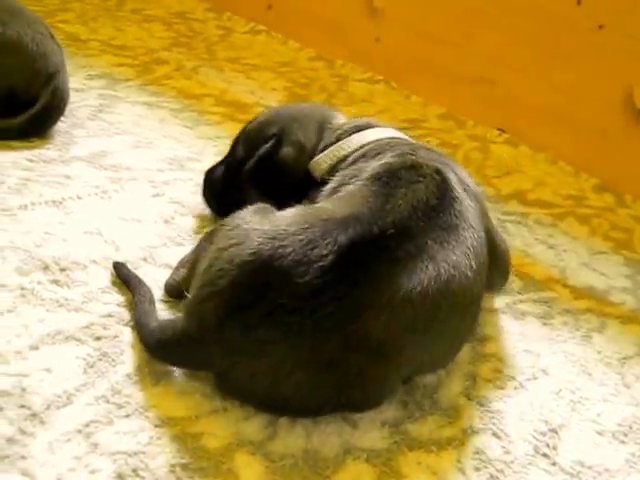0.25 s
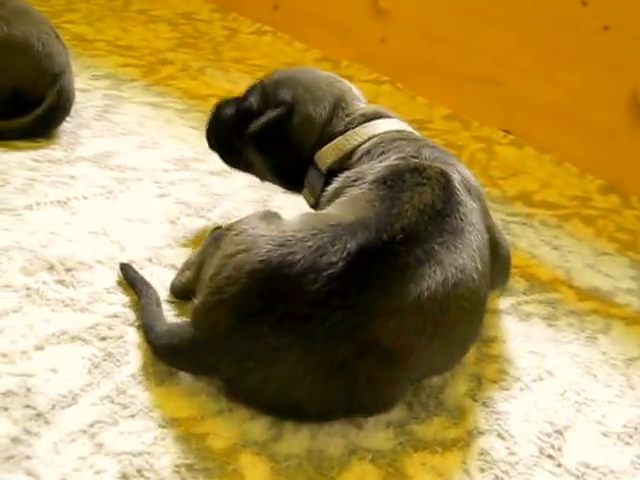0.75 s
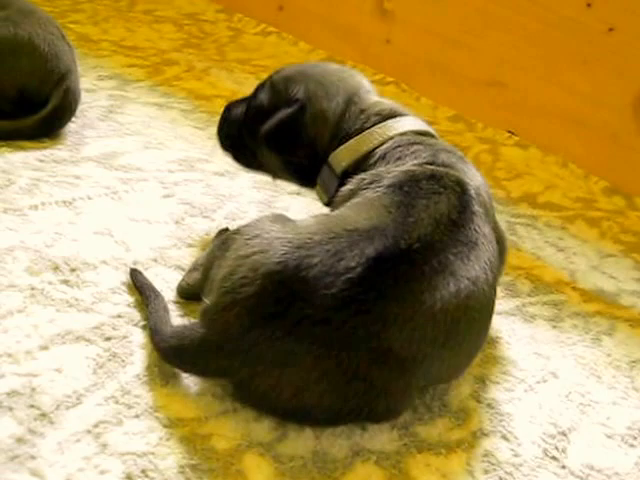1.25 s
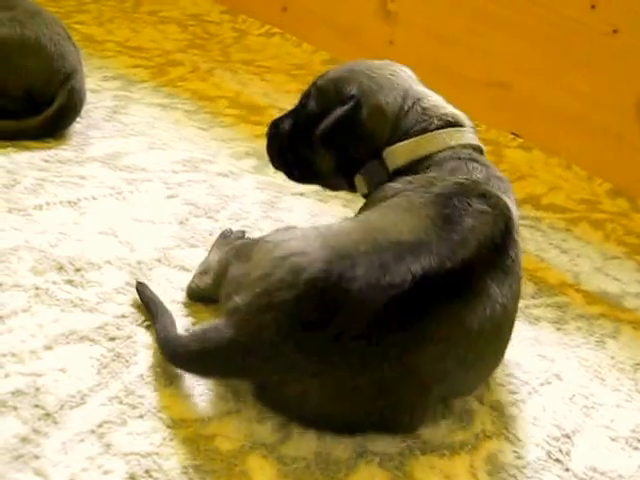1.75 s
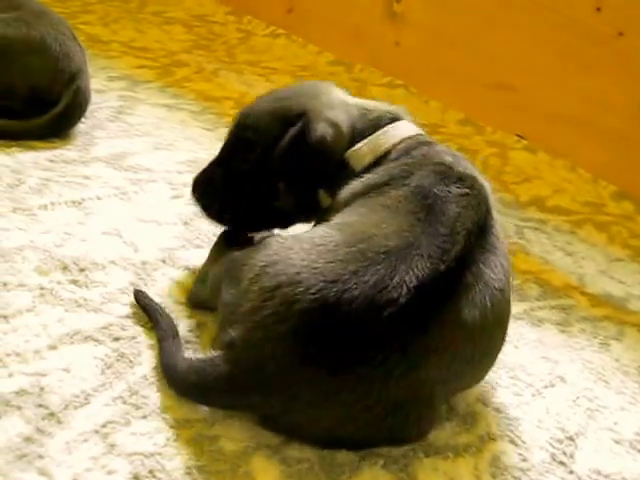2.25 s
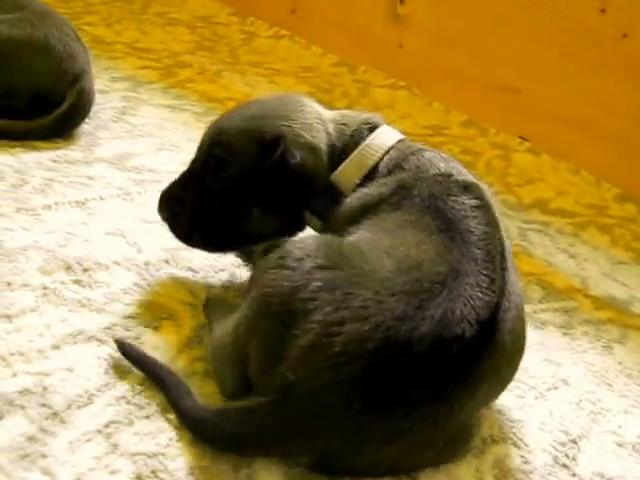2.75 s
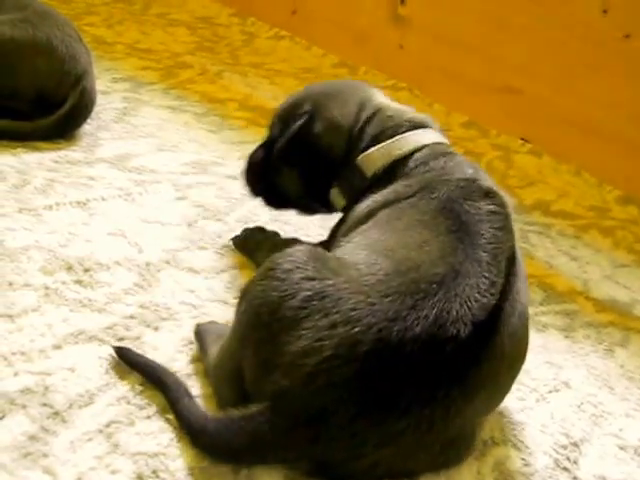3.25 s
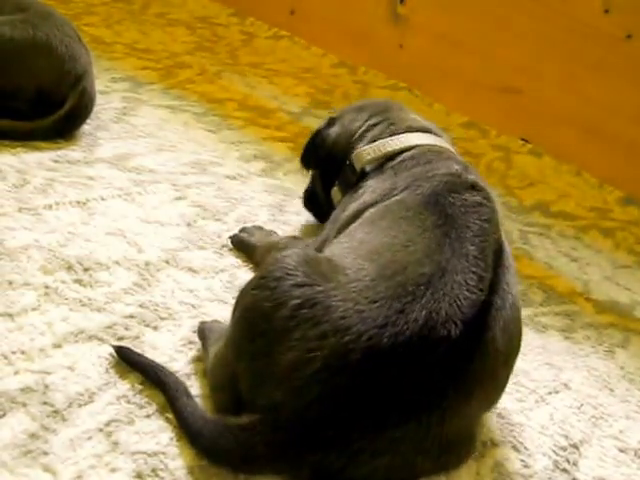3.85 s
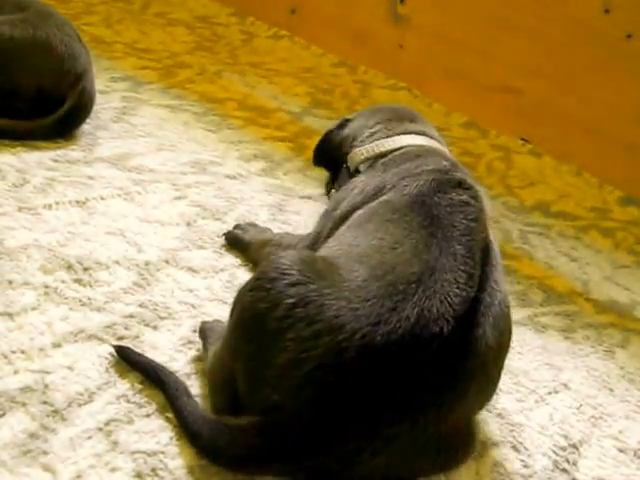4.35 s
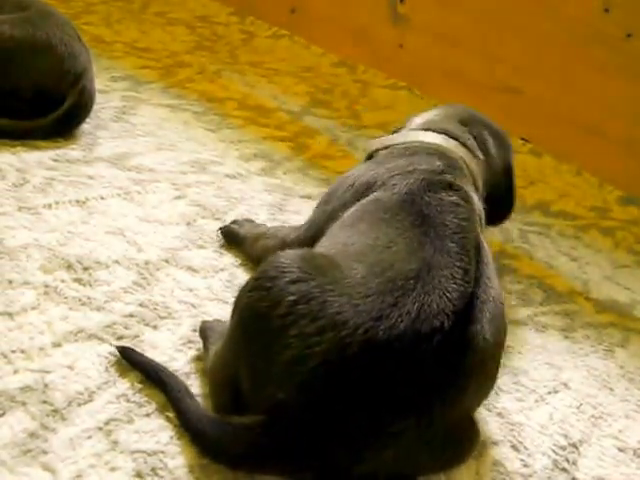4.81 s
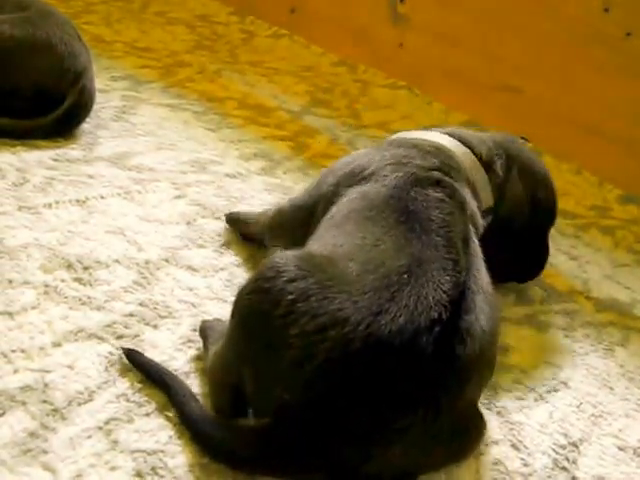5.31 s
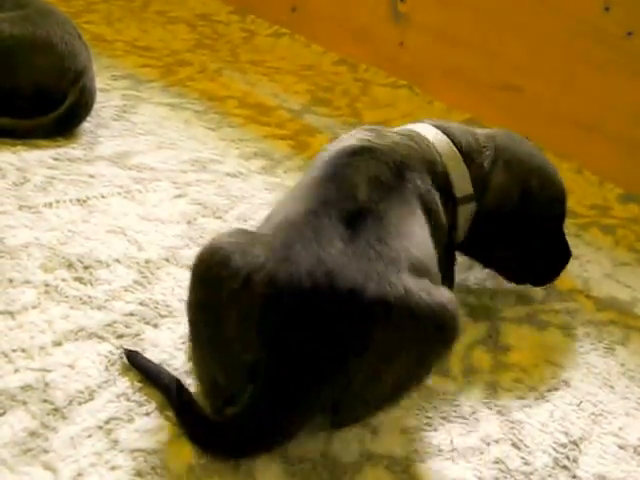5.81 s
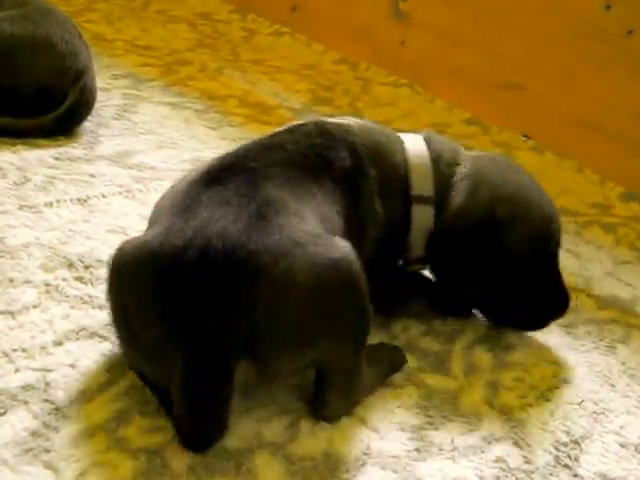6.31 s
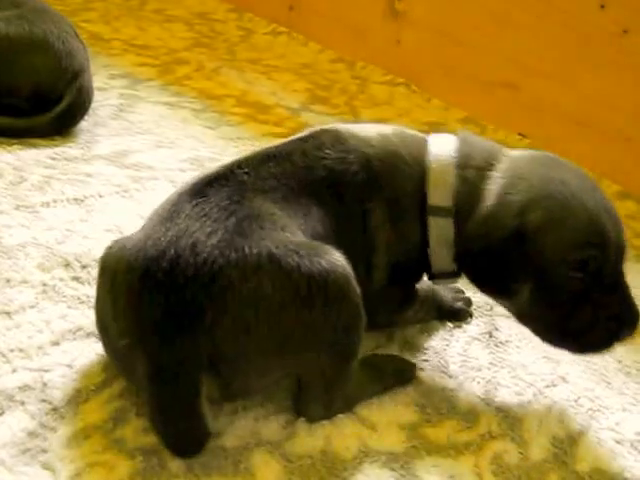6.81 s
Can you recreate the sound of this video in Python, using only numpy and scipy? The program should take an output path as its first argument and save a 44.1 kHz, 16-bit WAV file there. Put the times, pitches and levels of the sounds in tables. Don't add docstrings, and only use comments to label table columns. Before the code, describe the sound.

Brief puppy whines, high squeaks and creaky little grunts come one after another in a small hard-walled room, over soft thumps, ticks and hiss.

```python
import sys
import numpy as np
from scipy import signal
from scipy.fft import rfft, irfft, next_fast_len
from scipy.io import wavfile
from scipy.ndimage import uniform_filter1d, map_coordinates

SR = 44100
rng = np.random.default_rng(int(sys.argv[2]) if len(sys.argv) > 2 else 0)


def digitize_waveform(pressure):
    field = np.atleast_2d(pressure).T
    bounded = np.clip(field, -1, 1)
    quanta = np.round(bounded * 32767).astype(np.int16)
    wavfile.write(sys.argv[1], SR, quanta)


def amplitude_ratio(level_db):
    exponent = np.asarray(level_db, float) / 20
    return 10 ** exponent


N = 311787

# frequency in Hz, density in dB per Hz.
HISS_SPECTRUM = [(18, -51), (30, -7.5), (420, -3), (518, -6), (639, -3.5), (897, -5.5), (1470, -7),
                 (5740, -15), (7860, -18), (9430, -16), (15500, -23)]
# start in seconds, peak in dB, ring in Hz.
THUMPS = [(0.223, -54, 121), (0.249, -47.5, 403), (0.315, -50, 326), (0.383, -51, 350), (0.59, -53, 172),
          (0.734, -49, 272), (0.772, -48, 265), (1.593, -51, 145), (1.731, -50, 190), (1.865, -49, 277),
          (2.183, -48, 202), (2.676, -47, 254), (2.726, -46, 146), (3.484, -53, 191), (3.78, -45, 345),
          (3.834, -55, 196), (4.322, -55, 178), (4.404, -53, 200), (4.618, -52, 398), (4.811, -47, 450),
          (5.269, -49, 196), (5.615, -53, 293), (6.099, -50, 121)]
# frequency in Hz, t60 in seconds.
ROOM_DECAY = [(300, 0.21), (700, 0.55), (1100, 0.37), (2200, 0.21), (6000, 0.37)]
# centre in Hz, width in Hz, gain left as a ratio.
PORT_NOTCH = (7870, 1500, 0.033)
# start in seconds, length in seconds, pitch in Hz, glide in octaves, level in dB.
LITTERMATES = [
    (0.384, 0.155, 351, -0.064, -57),
    (.49, 0.024, 1730, -0.34, -62),
    (4.501, 0.076, 433, 0.0072, -62),
    (6.924, 0.066, 1280, -.1, -63),
]
# start in seconds, peak in dB, centre in Hz, t60 in seconds.
TICKS = [(0.104, -44, 750, 0.02), (2.912, -48, 13900, .02), (3.0355, -28.5, 9000, 0.0038),
         (3.036, -34, 3480, 0.014), (3.048, -41, 14500, 0.045), (3.254, -42, 9000, .015),
         (3.035, -37, 1800, .015), (3.619, -37, 9000, 0.012), (3.618, -43, 1090, 0.018),
         (5.043, -39, 1150, 0.02), (5.393, -32.5, 9500, 0.015), (5.425, -41, 15100, .03),
         (5.433, -42.5, 1390, .015), (5.497, -36, 13500, 0.019), (5.539, -32, 12000, 0.016),
         (5.541, -36.5, 3220, 0.032), (6.534, -41.5, 4500, 0.058), (6.536, -42, 14000, .03),
         (6.561, -37, 11000, 0.018), (6.595, -42, 14000, 0.048), (6.607, -49, 14000, 0.019)]
# centre in Hz, width over centre as a ratio.
TICK_WIDTH = [(1000, 0.92), (4000, 0.56), (10000, 2.5), (14500, 0.39)]
# start in seconds, length in seconds, level in dB, centre in Hz,
# width in Hz.
RUSTLES = [
    (0.968, 0.22, -60.5, 1610, 1500),
    (2.464, 0.031, -51, 4540, 6000),
    (2.965, .04, -64, 15000, 2500),
    (2.97, 0.034, -57, 3000, 3000),
    (3.111, 0.039, -58.5, 3870, 2500),
    (3.113, 0.047, -52, 1510, 1300),
    (3.154, 0.073, -55, 610, 513),
    (3.221, 0.046, -59, 2590, 1505),
    (5.94, 0.075, -61.5, 4270, 2500),
]

# start in seconds, length in seconds, pitch in Hz, level in dB,
# second partial in dB, third partial in dB.
HUMS = [(2.454, 0.015, 526, -33, 4, -5), (2.966, 0.02, 430, -39.5, 2.5, -10),
        (3.262, 0.04, 630, -44, -13, -17), (3.675, 0.034, 623, -43.5, -10, -20),
        (4.108, 0.043, 608, -44, -2, -10.5), (5.574, 0.018, 600, -47.5, 0, 3.5),
        (6.669, 0.022, 608, -35.5, -16, -24), (1.174, 0.025, 615, -37.5, -23, -24),
        (1.516, 0.016, 1156, -32, -30, -38), (1.923, .016, 1168, -31.5, -27, -40),
        (5.478, 0.011, 1170, -35.5, -20, -40), (5.836, .013, 1230, -34.5, -22, -40),
        (4.65, 0.023, 723, -44, -7, -20), (5.078, 0.019, 699, -41.5, -10, -20),
        (6.201, .018, 720, -40.5, -9, -20)]
# start in seconds, length in seconds, peak in dB, ring in Hz.
CREAKS = [(0.101, 0.026, -40.5, 333), (1.519, 0.023, -37, 1590), (1.924, 0.012, -29.5, 710),
          (2.321, 0.021, -32, 608), (2.745, 0.021, -32, 926), (3.271, 0.024, -37.5, 1100),
          (3.275, .03, -43, 1550), (3.674, 0.02, -41, 1290), (4.118, 0.039, -37, 870),
          (2.745, 0.015, -30.5, 590), (4.655, 0.024, -36, 1240), (5.08, 0.021, -36, 897),
          (5.48, 0.0095, -39.5, 600), (5.836, 0.014, -33, 803), (6.215, 0.041, -27, 1208),
          (6.672, 0.035, -32, 1050), (7.044, 0.047, -28, 642), (7.051, .03, -33.5, 400),
          (7.048, 0.044, -31.5, 1010)]
# start in seconds, peak in dB, ring in Hz.
STOPS = [(1.186, -41, 894), (1.648, -45, 2030), (2.072, -21.5, 753), (2.071, -31.5, 1217),
         (2.455, -23.5, 1042), (2.968, -34, 873), (3.386, -35, 438), (4.726, -34.5, 610), (5.14, -32, 592),
         (3.748, -37, 595), (5.986, -24.5, 903), (6.427, -28, 496), (6.755, -23, 910), (6.758, -27.5, 553),
         (6.77, -25, 680), (6.771, -32.5, 1036), (6.778, -28, 400)]

# time in seconds, pitch in Hz, effort in dB, mouth opening from 0 to 1.
SQUEAKS = [
    [(1.521, 807, -50, 0.9), (1.533, 880, -33.5, 0.5), (1.56, 1048, -37.5, 0.96), (1.572, 1162, -29, 0.35),
     (1.594, 1288, -32.5, 0.75), (1.62, 1184, -33.5, .6), (1.648, 1137, -40, 0.55),
     (1.662, 1070, -33.5, 0.52)],
    [(1.93, 697.5, -35.5, 0.36), (1.955, 771, -45, 0.58), (1.966, 868, -31.5, 0.59),
     (2.0, 1059, -34.5, 0.72), (2.018, 1037, -33, 0.38), (2.042, 848, -32.5, 0.13), (2.062, 823, -32, 0.5),
     (2.074, 810, -27.5, 0.63)],
    [(5.485, 926, -35, 0.97), (5.493, 948, -34, 0.67), (5.523, 1043, -40.5, 0.77), (5.531, 1114, -31, 0.64),
     (5.547, 1146, -32.5, 0.9), (5.57, 1144, -33.5, .8), (5.582, 1175, -38.5, 0.63),
     (5.595, 1160, -39, 0.64)],
    [(5.842, 903, -47, 1), (5.852, 983, -34.5, 0.84), (5.88, 1080, -40.5, 0.85), (5.888, 1167, -26.5, 0.92),
     (5.91, 1266, -26, 0.98), (5.935, 1157, -30, 0.82), (5.958, 1092, -29.5, 0.74), (5.97, 1041, -34, 0.69),
     (5.995, 949, -38.5, 1)],
]
WHIMPERS = [
    [(2.33, 467, -43.5, 0.55), (2.372, 515.7, -34, 0.57), (2.395, 563.5, -33, 0.6),
     (2.415, 614.4, -30, 0.35), (2.43, 637.7, -32.5, 1), (2.45, 652, -31.5, 0.98), (2.46, 613, -30, 0.75)],
    [(2.758, 562, -40.5, 0.3), (2.778, 460.4, -39.5, 0.43), (2.803, 489, -37, 0.57),
     (2.841, 589, -37, 0.48), (2.87, 524.5, -39, 0.34), (2.91, 548.4, -37, 0.48),
     (2.955, 537.3, -33.5, 0.72), (2.974, 503, -40.5, 0.24)],
    [(5.087, 483.5, -52, 0.46), (5.11, 490.4, -49.5, 0.57), (5.127, 499, -50.5, 0.62),
     (5.143, 565, -37.5, 0.37), (5.155, 580, -48, .1)],
    [(6.228, 612.6, -47, 0.04), (6.238, 564, -36.5, 0.3), (6.249, 498, -37.5, 0.63),
     (6.275, 560, -33.5, 0.7), (6.29, 575, -30.5, 0.71), (6.312, 581.5, -29.5, 0.76),
     (6.345, 535.5, -35, 0.64), (6.418, 491.2, -39.5, 0.51), (6.436, 429, -41, 0)],
    [(1.015, 306.6, -59.5, 0.23), (1.057, 307, -62, 0.37), (1.088, 287, -56, 0.06)],
]
GRUNTS = [
    [(1.094, 383.5, -58, 0.4), (1.108, 382, -53, 0.5), (1.125, 375, -47, 0.42), (1.14, 366, -40, 0.41),
     (1.153, 411.5, -43.5, 0.76), (1.165, 446, -40.5, 0.33), (1.18, 462, -48, 0.43), (1.192, 450, -60, 0.3)],
    [(3.28, 436, -46, 0.06), (3.305, 435, -45, 0.34), (3.323, 384.6, -37, 0.82), (3.335, 417, -41, 0.65),
     (3.35, 445, -36.5, 0.4), (3.375, 462, -38.5, 0.4), (3.388, 436, -38.5, .35), (3.397, 425, -54, 0.24)],
    [(3.688, 433, -43.5, 0.63), (3.7, 406, -44, 1), (3.724, 358.3, -43.5, 0.27), (3.735, 371, -43.5, 0.32),
     (3.743, 378, -39, 0.48), (3.752, 379, -48, 0.4), (3.761, 365, -61, 0)],
    [(4.14, 435, -47, 0.57), (4.154, 386, -45.5, 0.3), (4.168, 386, -49.5, 0.4), (4.176, 375, -43.5, 0.39),
     (4.184, 370, -52, 0.1)],
    [(4.662, 426, -41, 0.83), (4.675, 463.3, -38, 0.46), (4.698, 445.4, -38, 0.54), (4.71, 459, -37, 0.48),
     (4.722, 473, -38.5, 0.59), (4.732, 470, -58, 0)],
    [(6.68, 522.6, -45, 0.38), (6.7, 442, -51.5, 0.37), (6.722, 367.5, -42, 0.48),
     (6.735, 370.5, -43.5, 0.6), (6.748, 395, -40.5, 0.3), (6.76, 408, -41, 0)],
]
# one value in dB a call, in the order squeaks, whimpers, grunts.
CHEST_DB = [2, 1, -2, 0, 4, 2, 1, 4.5, 13.5, 6, 3.5, 5.5, 6.5, 0, 13]
# treble in dB, partials above the third in dB,
# second throat resonance in dB, top throat resonances in dB.
HEAD_AIM = [(-19.5, -6, -1, -21), (-13.5, 0, -7.5, -12.5), (-25, 2, 3, -15), (-21, -2, 7, -34),
            (-12.5, 7.5, -15, -9.5), (-17, 11, -9.5, -10), (-24.5, 15.5, 0, 1), (-14.5, 7, -4.5, -7),
            (-23, 1, -6, -8), (-16.5, 1, -12, -8), (-22, -2.5, -7, -8), (-29, 3, 1, -3), (-38, 9, -7, -9),
            (-18, 2, -4.5, -1.5), (-13.5, 1, -7, -6)]
# frequency in Hz, gain in dB.
AIRWAY = [(350, -12), (600, -5), (900, 0), (1250, 0), (1700, -4), (2100, -13), (2500, -29), (3300, -48)]
# frequency in Hz, gain in dB.
ROLL_OFF = [(900, -17), (1500, -15), (1800, -21), (2100, -30.5), (2500, -34), (3500, -63), (5000, -89)]
# centre in Hz, width in Hz.
THROAT = [(5850, 1060), (10000, 1070), (11800, 860), (14200, 1300)]
# start in seconds, end in seconds, halfway lines in dB, band centre in Hz,
# band width in Hz.
DOUBLING = [
    (2.84, 2.905, 2, 1400, 2900),
    (2.885, 2.96, -10, 1200, 2000),
    (5.46, 5.515, -2.5, 1350, 390),
    (4.3, 5.87, 3, 1240, 670),
    (1.8, 2.0, -22, 1500, 600),
]
# start in seconds, end in seconds, depth in dB.
HOARSE = [(1.523, 1.555, -9), (1.93, 1.975, -7), (2.06, 2.083, -8), (1.12, 1.19, -16), (2.33, 2.46, -20),
          (2.758, 2.79, -12), (2.79, 2.91, -16), (3.28, 3.33, -13), (3.36, 3.397, -18), (3.688, 3.715, -12),
          (4.14, 4.16, -13), (4.662, 4.732, -15), (6.26, 6.436, -22), (5.842, 5.885, -10),
          (6.228, 6.255, -7), (6.68, 6.71, -12)]

SHUT_HZ, OPEN_OCTAVES, MOUTH_Q, MOUTH_DB = 511.4, 2, 1.74, 10.5
NASAL_HZ, NASAL_WIDTH_HZ, NASAL_DB = 810, 46, -7.5
LOUD_DB, TREBLE_DB_PER_EFFORT_DB, TREBLE_RISE_DB, TOP_STEP_DB = -35, 0.51, 2.5, -9
STOP_S, CREAK_RATE_HZ, RATE_EXPONENT = 0.017, 300.3, 0.27


def along(points, hz):
    f, v = np.transpose(points)
    return np.interp(np.log(hz + 1), np.log(f + 1), v)


def unit(x):
    return x / np.sqrt(np.mean(x ** 2) + 1e-20)


def wobble(n, rate_hz):
    knots = rng.standard_normal(int(n * rate_hz / SR) + 4)
    return map_coordinates(knots, [np.arange(n) * rate_hz / SR])


def filtered(x, response):
    m = next_fast_len(len(x) + 8192)
    return irfft(rfft(x, m) * response(np.fft.rfftfreq(m, 1 / SR)), m)[:len(x)]


def resonance(f, hz, width_hz):
    return 1j * f * width_hz / (hz * hz - f * f + 1j * f * width_hz)


def stretch(t, start, end, edge_s):
    return np.clip(np.minimum(t - start, end - t) / edge_s, 0, 1)


def add(track, s, x):
    part = track[round(s * SR):][:len(x)]
    part += x[:len(part)]


def thumps():
    track, t = np.zeros(N), np.arange(2000) / SR
    for s, db, hz in THUMPS:
        push = t / 0.0061 * np.exp(1 - t / 0.0051)
        add(track, s, amplitude_ratio(db - 4.5) * np.sin(2 * np.pi * hz * t) * push)
    return track


def hiss():
    steady = unit(filtered(rng.standard_normal(N), lambda f: amplitude_ratio(along(HISS_SPECTRUM, f))))
    when, size = rng.random((2, 90))
    blows = np.bincount((when * N).astype(int), amplitude_ratio(11 * size), N)
    patter = filtered(blows, lambda f: resonance(f, 200, 220) ** 2)
    return amplitude_ratio(-55.5) * steady + amplitude_ratio(-72) * unit(patter) + thumps()


def room(x, sway_hz, box_db, box_t60_s):
    hz, t, z = signal.stft(rng.standard_normal((3, SR // 2)), SR, nperseg=256)
    decay = amplitude_ratio(-60 * t / along(ROOM_DECAY, hz)[:, None])
    decay = decay + amplitude_ratio(box_db - 60 * t / box_t60_s)
    tails = signal.istft(z * decay, SR, nperseg=256)[1]
    aim = np.array([wobble(N, sway_hz) for _ in tails])
    feeds = x * aim / np.linalg.norm(aim, axis=0)
    feeds = np.pad(feeds, ((0, 0), (220, 0)))
    tails = tails / np.linalg.norm(tails[0])
    return signal.fftconvolve(feeds, tails, axes=1).sum(axis=0)[:N]


def littermates():
    track = np.zeros(N)
    for s, length, hz, octaves, db in LITTERMATES:
        u = np.arange(round(length * SR)) / (length * SR)
        phase = 2 * np.pi * np.cumsum(hz * 2 ** (octaves * u)) / SR
        swell = amplitude_ratio(db + 3 + wobble(len(u), 30)) * np.sin(np.pi * u) ** 0.4
        add(track, s, swell * np.sin(phase))
    return track


def bedding():
    track, t = np.zeros(N), np.arange(3000) / SR
    for s, db, hz, t60 in TICKS:
        puff = rng.standard_normal(len(t)) * amplitude_ratio(-60 * t / t60)
        width = hz * along(TICK_WIDTH, hz)
        puff = filtered(puff, lambda f: resonance(f, hz, width) ** 2)
        add(track, s, amplitude_ratio(db) * puff / np.abs(puff).max())
    for s, length, db, hz, width in RUSTLES:
        n = round(length * SR)
        fibres = rng.standard_normal(n) * amplitude_ratio(3.2 * wobble(n, 126)) * np.hanning(n) ** 0.24
        add(track, s, amplitude_ratio(db) * unit(filtered(fibres, lambda f: resonance(f, hz, width) ** 2)))
    return track


def hums():
    track = np.zeros(N)
    for s, length, hz, db, second_db, third_db in HUMS:
        u = np.arange(round(length * SR)) / (length * SR)
        phase = 2 * np.pi * np.cumsum(hz * (1 + 0.02 * wobble(len(u), 150))) / SR
        tone = np.sin(phase) + amplitude_ratio(second_db) * np.sin(2 * phase) + amplitude_ratio(third_db) * np.sin(3 * phase)
        swell = np.abs(np.sin(np.pi * u)) ** 0.7 * (1 + 0.35 * wobble(len(u), 300))
        add(track, s, amplitude_ratio(db + 3) * swell * tone)
    return track


def throat(f, head_db):
    gain = amplitude_ratio(-22.5) * np.abs(resonance(f, 3380, 800)) ** 2
    for (hz, width), db in zip(THROAT, (0, *head_db)):
        gain = gain + amplitude_ratio(db) * np.abs(resonance(f, hz, width)) ** 2
    return gain


def creak(length_s, ring_hz, rate_hz, scatter, breath_db):
    n = round((length_s + 0.03) * SR)
    gaps, sizes = rng.standard_normal((2, 40))
    when = (np.cumsum(np.exp(scatter * gaps)) - 0.5) / rate_hz
    keep = (when > 0) & (when < length_s)
    strength = np.sqrt(np.abs(np.sin(np.pi * when / length_s))) * amplitude_ratio(2.0 * sizes)
    pulses = np.bincount((when[keep] * SR).astype(int), strength[keep], n)

    def closed_mouth(f):
        ring = resonance(f, ring_hz, 110) * resonance(f, ring_hz, 520)
        cavity = 0.26 * resonance(f, 1784, 302) - 0.23 * resonance(f, 927, 430)
        return ring + cavity * resonance(f, 1070, 1050) ** 2

    x = filtered(pulses, closed_mouth)
    air = unit(filtered(rng.standard_normal(n), lambda f: throat(f, (-3, -3, -3))))
    swell = np.sin(np.pi * np.clip(np.arange(n) / (length_s * SR), 0, 1))
    return x / np.abs(x).max() + amplitude_ratio(breath_db) * air * swell


def low_partials_db(hz, effort_db, opening, chest_db):
    mouth_hz = SHUT_HZ * 2 ** (OPEN_OCTAVES * np.clip(opening, 0, 1.1))
    mouth = MOUTH_DB * np.abs(resonance(hz, mouth_hz, mouth_hz / MOUTH_Q)) ** 2
    nose = NASAL_DB * np.exp(-((hz - NASAL_HZ) / NASAL_WIDTH_HZ * 2) ** 2)
    chest = np.array([[chest_db], [0], [0]])
    return effort_db + along(AIRWAY, hz) + mouth + nose + chest


def doubled(voice, t, phase):
    for start, end, db, hz, width in DOUBLING:
        if t[0] < end < t[-1]:
            halves = voice * stretch(t, start, end, 0.016) * np.sin(phase / 2)
            voice = voice + amplitude_ratio(db) * filtered(halves, lambda f: resonance(f, hz, width) ** 2)
    return voice


def hoarse(voice, t):
    depth = sum(amplitude_ratio(db) * stretch(t, start, end, 0.025) for start, end, db in HOARSE)
    return voice * (1 + depth * wobble(len(t), 600))


def squeak(rows, chest_db, treble_db, upper_db, second_db, top_db, jitter, shimmer_db, breath_db):
    s, *columns = np.transpose(rows)
    t = np.arange(s[0], s[-1], 1 / SR)
    pitch, effort, opening = [uniform_filter1d(np.interp(t, s, c), size=260) for c in columns]
    head_db = (second_db, top_db, top_db + TOP_STEP_DB)
    treble = LOUD_DB + treble_db + TREBLE_DB_PER_EFFORT_DB * (effort - LOUD_DB)
    treble = treble + TREBLE_RISE_DB * (t - s[0]) / (s[-1] - s[0])
    pitch = pitch * (1 + jitter * wobble(len(t), 249.5))
    phase = 2 * np.pi * np.cumsum(pitch) / SR
    k = np.arange(1, int(15800 / pitch.min()) + 1)[:, None]

    low = low_partials_db(k[:3] * pitch, effort, opening, chest_db)
    upper = low[2] + upper_db + along(ROLL_OFF, k[3:] * pitch)
    spacing_db = 10 * np.log10(pitch / 1600)
    gains = amplitude_ratio(np.vstack([low, upper]))
    gains = gains + amplitude_ratio(treble + spacing_db) * throat(k * pitch, head_db)
    flutter = np.array([wobble(len(t), 70) for _ in range(5)])[k[:, 0] % 5]
    gains = gains * amplitude_ratio(shimmer_db * flutter * np.where(k > 3, 2, 1))
    turn = rng.uniform(0, 2 * np.pi, k.shape)
    voice = np.sqrt(2) * np.sum(gains * np.sin(k * phase + turn), axis=0)
    voice = hoarse(doubled(voice, t, phase), t)

    air = unit(filtered(rng.standard_normal(len(t)), lambda f: throat(f, head_db)))
    breath_db = breath_db - 5 * np.log2(pitch / 500)
    voice = voice + amplitude_ratio(treble + breath_db) * air * (1 + 0.2 * np.sin(phase))
    return voice * stretch(t, s[0], s[-1], 0.0038)


def puppy():
    track = littermates() + hums()
    for rows, chest_db, head in zip(SQUEAKS + WHIMPERS + GRUNTS, CHEST_DB, HEAD_AIM):
        call = squeak(rows, chest_db, *head, jitter=0.0025, shimmer_db=1.3, breath_db=-7)
        add(track, rows[0][0], call)
    stops = [(s, STOP_S, db, hz) for s, db, hz in STOPS]
    for s, length, db, ring_hz in CREAKS + stops:
        rate_hz = CREAK_RATE_HZ * (ring_hz / 600) ** RATE_EXPONENT
        add(track, s, amplitude_ratio(db) * creak(length, ring_hz, rate_hz, scatter=0.2007, breath_db=-27))
    return filtered(track, lambda f: resonance(f, 300, 300) * 1j * f / 300)


def scene():
    near = puppy() + bedding()
    echo = room(near, sway_hz=24, box_db=-1, box_t60_s=0.19)
    return (near + amplitude_ratio(-8.5) * echo + hiss())[None]


def band_limit(x):
    return signal.sosfilt(signal.butter(12, 16600, fs=SR, output="sos"), x)


def record(dry):
    hz, width, left = PORT_NOTCH
    port = filtered(dry[0], lambda f: (1 - (1 - left) * resonance(f, hz, width)) * (f < 15830))
    return band_limit(port[None])


dry = scene()
out = record(dry)
digitize_waveform(out)
```